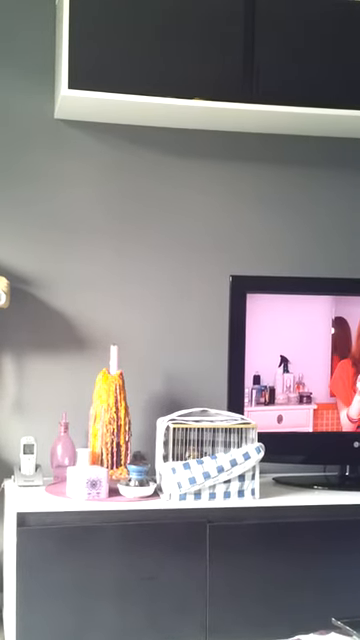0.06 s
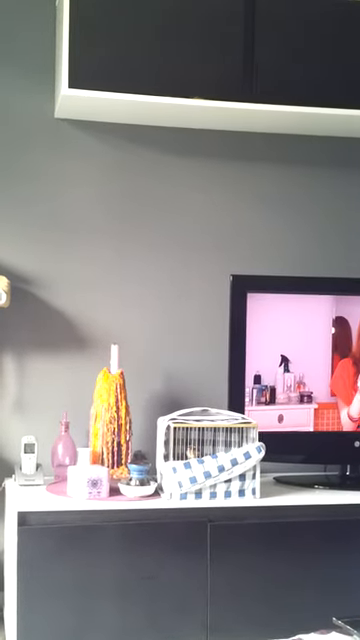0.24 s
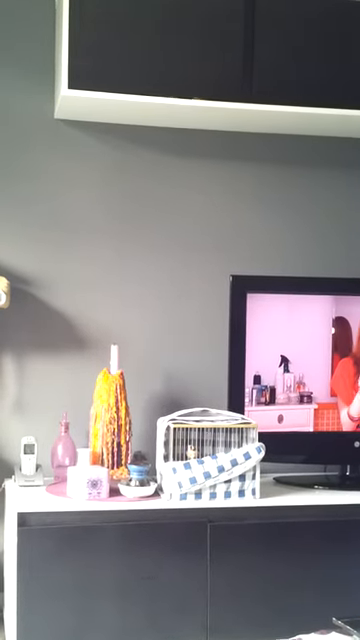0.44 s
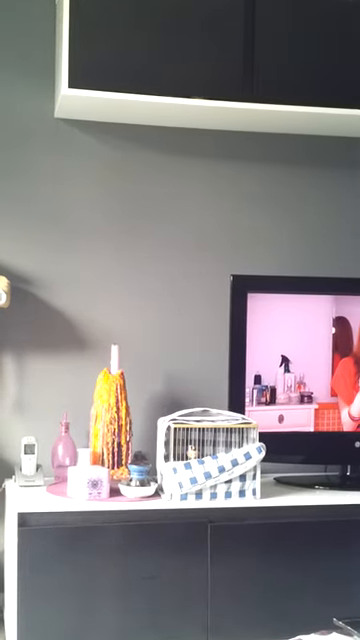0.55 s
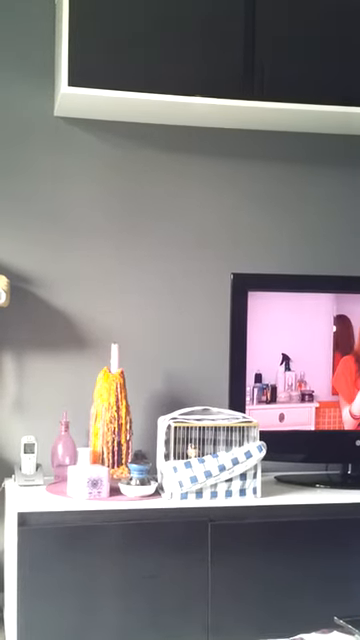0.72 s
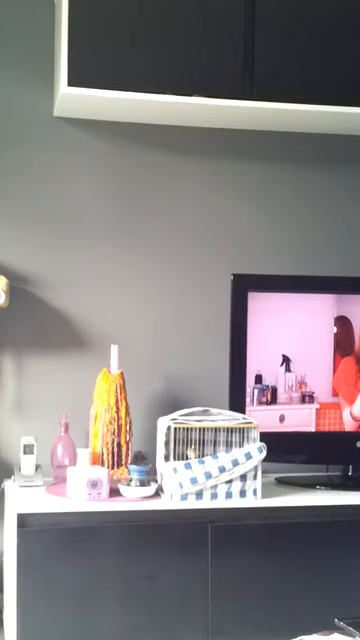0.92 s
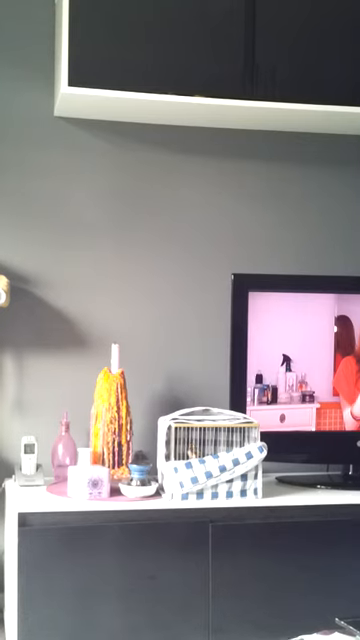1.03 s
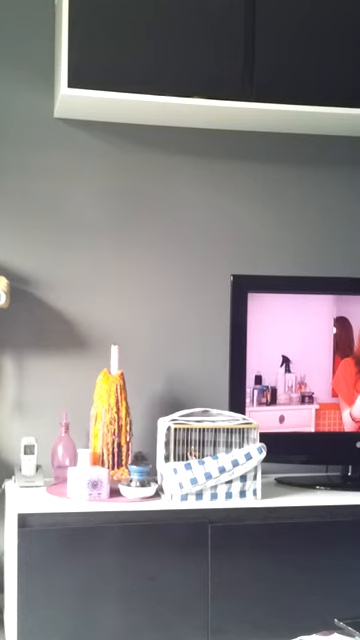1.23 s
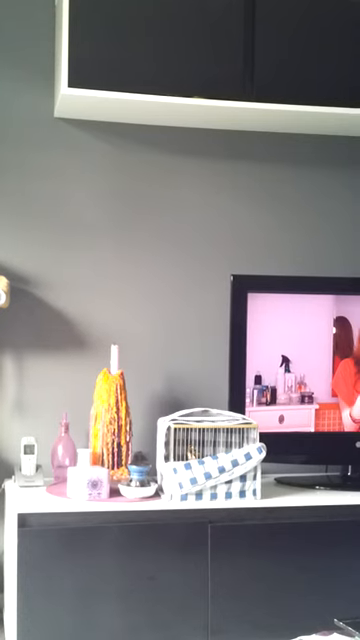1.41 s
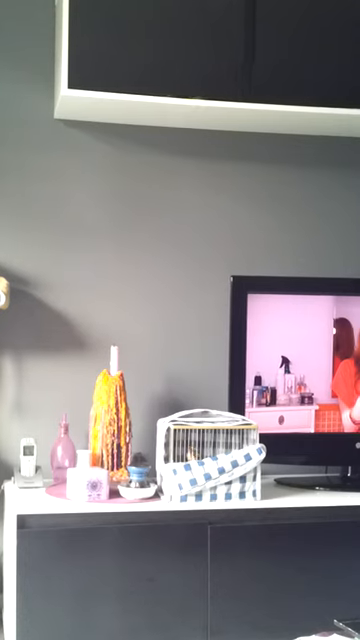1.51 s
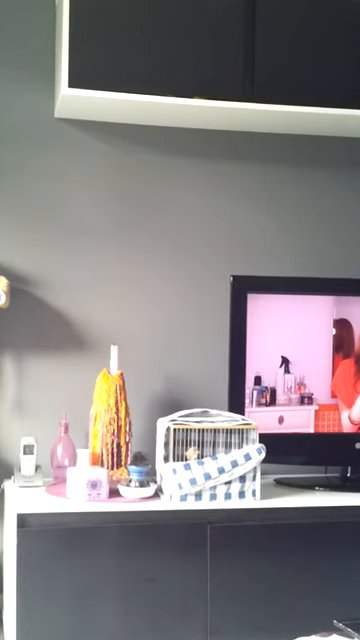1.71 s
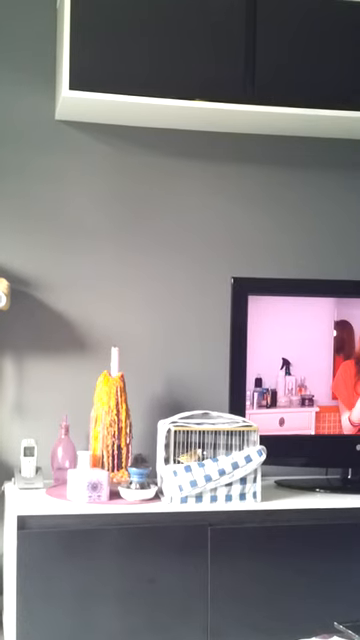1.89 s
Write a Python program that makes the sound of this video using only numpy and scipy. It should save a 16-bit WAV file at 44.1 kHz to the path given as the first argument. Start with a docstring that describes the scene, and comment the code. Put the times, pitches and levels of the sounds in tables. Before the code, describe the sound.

A caged songbird gives one short burst of whistled, raspy chirps indoors.

```python
"""A caged goldfinch sings one quick phrase in a quiet, hard-walled living room.
The two sides of its syrinx whistle gliding notes and rasp, at times together.
Cage, wall and cabinet reflect the song, and the room rings on after it.
A soft low bump follows. Faint room noise runs throughout."""
import sys
import numpy as np
from scipy import signal
from scipy.fft import rfft, irfft
from scipy.io import wavfile
from scipy.ndimage import uniform_filter1d

SR = 44100
rng = np.random.default_rng(int(sys.argv[2]) if len(sys.argv) > 2 else 0)


def unload_audio(sound):
    """Save the sound as a 16-bit wav file, at the path given as the first command line argument."""
    columns = np.transpose(np.atleast_2d(sound))
    # keep every value between -1 and 1, then stretch to whole-number steps
    steps = np.round(np.clip(columns, -1, 1) * 32767)
    wavfile.write(sys.argv[1], SR, steps.astype(np.int16))


N = 85995


def amp(db):
    """Decibels to gain."""
    return 10 ** (np.asarray(db) / 20)


def unit_rms(x):
    """Scales to rms 1."""
    return x / np.sqrt(np.mean(x ** 2) + 1e-20)


def interp_log_hz(points, hz):
    """Interpolates (Hz, value) rows on a log-frequency axis."""
    points_hz, values = np.transpose(points)
    return np.interp(np.log(hz + 1), np.log(points_hz + 1), values)


def ramp(u):
    """Smooth step from 0 to 1."""
    return np.sin(np.pi / 2 * np.clip(u, 0, 1)) ** 2


def wander(rate_hz):
    """Random motion, rms 1, rolling off above rate_hz."""
    hz = np.fft.rfftfreq(N, 1 / SR)
    return unit_rms(irfft(rfft(rng.standard_normal(N)) * np.exp(-(hz / rate_hz) ** 2), N))


# Room noise spectrum. Each row: frequency in Hz, relative density in dB.
NOISE_SPECTRUM = [(15, -25), (25, -2), (54, 2), (123, -8.5), (140, 2.5), (168, -5), (201, -2), (364, -6),
                  (676, -12), (921, -11), (1390, -14), (1620, -12), (2860, -18.5), (4790, -18.5),
                  (11800, -25), (15300, -44), (22000, -120)]
# Midrange swell. Each row: time in seconds, gain at band centre in dB.
MID_SWELL = [(0, -4), (.6, -1.5), (1.2, -3), (1.42, -0.5), (1.6, -0.5), (1.7, -2.5), (1.95, -3)]
# Rumble swell. Each row: time in seconds, gain at band centre in dB.
RUMBLE_SWELL = [(0, -3), (.65, -1.5), (.88, 3), (1.3, 1.5), (1.5, -1), (1.95, -1)]
def room_noise(level_db=-56.5, patch_depth_db=2):
    """Faint noise with drifting patches; midrange and rumble swell slightly."""
    hz, t, spectrum = signal.stft(rng.standard_normal(N), SR, nperseg=2048, noverlap=1536)

    def swell_db(points, centre_hz, width_octaves):
        band = np.exp(-(np.log2((hz + 1) / centre_hz) / width_octaves) ** 2)
        return band[:, None] * np.interp(t, *np.transpose(points))

    patches = uniform_filter1d(rng.standard_normal(spectrum.shape), size=10, axis=0)
    patches = unit_rms(uniform_filter1d(patches, size=7, axis=1))
    base_db = interp_log_hz(NOISE_SPECTRUM, hz)[:, None]
    mid_db = swell_db(MID_SWELL, centre_hz=1160, width_octaves=2.6)
    rumble_db = swell_db(RUMBLE_SWELL, centre_hz=50, width_octaves=0.7)
    spectrum *= amp(base_db + patch_depth_db * patches + mid_db + rumble_db)
    noise = signal.istft(spectrum, SR, nperseg=2048, noverlap=1536)[1][:N]
    return amp(level_db) * unit_rms(noise)


def syrinx_side(notes, release_s=0.0083, rasp_spread_hz=626, rasp_rate_hz=503, flutter_depth=0.79):
    """Notes glide towards a goal pitch; rasp shakes pitch and level. Returns complex tone and octave."""
    tone, octave = np.zeros((2, N), complex)
    shake, flutter = wander(rasp_rate_hz), wander(rasp_rate_hz)
    for start_s, length_s, first_hz, goal_hz, glide_s, level_db, rise_s, rasp, octave_db in notes:
        t = np.arange(N) / SR - start_s
        on = (t > 0) & (t < length_s + release_s)
        t = t[on]
        hz = goal_hz + (first_hz - goal_hz) * np.exp(-t / glide_s)
        hz += rasp * rasp_spread_hz * shake[on]
        envelope = amp(level_db) * ramp(t / rise_s) * ramp((length_s + release_s - t) / release_s)
        envelope *= 1 + rasp * flutter_depth * flutter[on]
        phasor = np.exp(2j * np.pi * np.cumsum(hz) / SR)
        tone[on] += envelope * phasor
        octave[on] += envelope * amp(octave_db) * phasor ** 2
    return tone, octave


# Notes of the low side of the syrinx. Each row: start in seconds, length in seconds, first pitch in Hz,
# goal pitch in Hz, glide time constant in seconds, level in dB, rise in seconds, rasp from 0 to 1,
# octave level in dB re the note.
LOW_NOTES = [ (.209, 0.013, 5690, 5140, 0.0089, -41, 0.008, 0.02, -28),
             (.219, 0.053, 5410, 5060, 0.0048, -26, 0.0084, 0.01, -30),
             (.355, 0.033, 3507, 4250, 0.01874, -29, 0.0092, 0.02, -36),
             (.455, 0.023, 2197, 3552, 0.0082, -36.5, 0.0057, 0.44, -19),
             (.480, 0.046, 4124, 4690, 0.0089, -26.5, 0.0036, 0.03, -29),
             (.548, 0.0317, 2479, 2953, 0.01476, -31, 0.022, 0.27, -21),
             (.572, 0.03, 3000, 3850, 0.018, -33.5, 0.004, 0.33, -24),
             (.652, 0.034, 3413, 3293, 0.03, -38, 0.0097, 0.84, -20),
             (.688, 0.045, 2331, 4250, .014, -33, 0.0053, 0.29, -41),
             (.720, 0.0235, 2445, 3024, 0.0202, -41.5, 0.0033, 0.68, -37),
             (.752, 0.027, 3385, 3310, 0.016, -34, 0.0084, 0.18, -16),
             (.793, 0.0582, 2704, 2420, 0.03, -39, 0.025, 0.27, -12.5)]
# Notes of the high side. Same columns.
HIGH_NOTES = [ (.218, 0.079, 6070, 6400, 0.0127, -41, 0.0053, 0.085, -30),
              (.657, 0.03, 4300, 4800, 0.01455, -40.5, 0.006, 0.817, -25),
              (.679, 0.031, 5145, 5873, 0.00952, -34, 0.005, 0.578, -27),
              (.719, 0.08, 4420, 4099, 0.0157, -25.5, 0.018, 0.0082, -25.5)]
def goldfinch(breath_db=-26.5, mixing_ref_db=-31, throat_hz=2320):
    """Both sides sound with octaves, combination tones and breath; the throat cuts the lows."""
    low, low_octave = syrinx_side(LOW_NOTES)
    high, high_octave = syrinx_side(HIGH_NOTES)
    high_phasor = high / (abs(high) + 1e-9)
    sum_tone = amp(-18.5) * high * low
    lower_sideband = amp(-17) * high * high_phasor * low.conj()  # 2 f_high - f_low
    upper_sideband = amp(-30) * high * high_phasor * low  # 2 f_high + f_low
    combination = (sum_tone + lower_sideband + upper_sideband) / amp(mixing_ref_db)
    breath = amp(breath_db) * (low + high) * wander(rate_hz=1780)
    voice = low + high + low_octave + high_octave + combination + breath
    throat = signal.butter(8, throat_hz, "high", fs=SR, output="sos")
    return signal.sosfilt(throat, voice.real)


# First reflections from cage, wall and cabinet. Each row: delay in seconds, linear gain.
REFLECTIONS = [(.0031, 0.27), (.0074, .45), (0.0115, .4), (.0205, .35)]
def near_echoes(x):
    """Nearby surfaces add delayed copies to the direct sound."""
    hz = np.fft.rfftfreq(N, 1 / SR)
    echoes = sum(gain * np.exp(-2j * np.pi * hz * delay_s) for delay_s, gain in REFLECTIONS)
    return irfft(rfft(x) * (1 + echoes), N)


# Room decay. Each row: frequency in Hz, T60 in seconds.
ROOM_T60 = [(200, 0.13), (2500, 0.59), (4100, 0.56), (5500, 0.55), (8000, 0.63), (12000, 0.64)]
def room_reverb(x, wet_db, build_s=0.015):
    """Hard walls add a dense tail that dies band by band."""
    hz, t, spectrum = signal.stft(rng.standard_normal(SR), SR, nperseg=256)
    decay = amp(-60 * t / interp_log_hz(ROOM_T60, hz)[:, None])
    tail = signal.istft(spectrum * decay * ramp(t / build_s), SR, nperseg=256)[1]
    return x + amp(wet_db) * signal.fftconvolve(x, tail / np.linalg.norm(tail))[:N]


def bump(start_s=1.153, pitch_hz=203, level_db=-38, rise_s=0.016, hold_s=0.0062, decay_s=0.0014):
    """A soft, well-damped low knock that swells for a few cycles and stops."""
    t = np.maximum(np.arange(N) / SR - start_s, 0)
    fade = np.exp(-np.maximum(t - rise_s - hold_s, 0) / decay_s)
    return amp(level_db) * ramp(t / rise_s) * fade * np.sin(2 * np.pi * pitch_hz * t)


def scene():
    """Bird and bump in the room, over its noise; mono."""
    song = room_reverb(near_echoes(goldfinch()), wet_db=-1)
    knock = room_reverb(bump(), wet_db=3)
    return (song + knock + room_noise())[None]


def record(dry, cutoff_hz=12000):
    """Steep linear-phase low-pass."""
    low_pass = signal.firwin(511, cutoff_hz, window=("kaiser", 9), fs=SR)
    return signal.oaconvolve(dry, low_pass[None], "same")


dry = scene()
out = record(dry)
unload_audio(out)
```